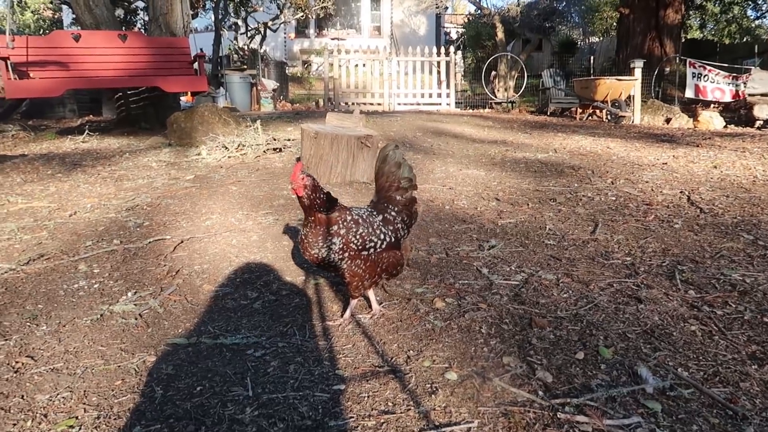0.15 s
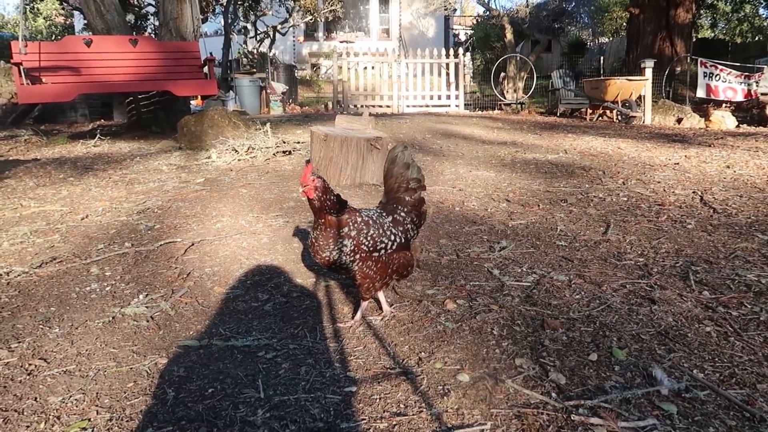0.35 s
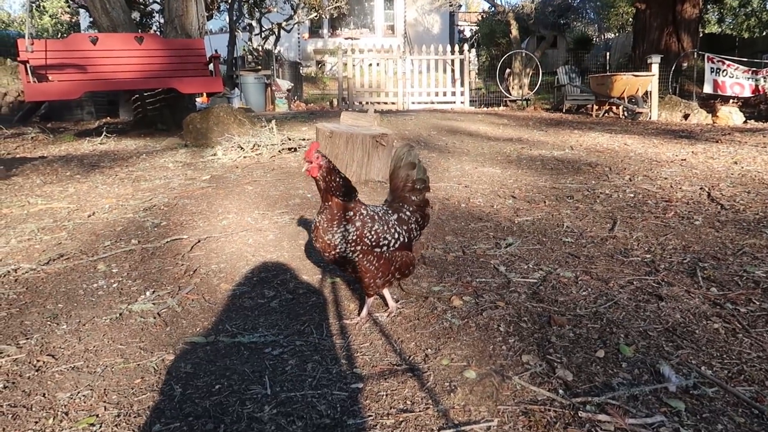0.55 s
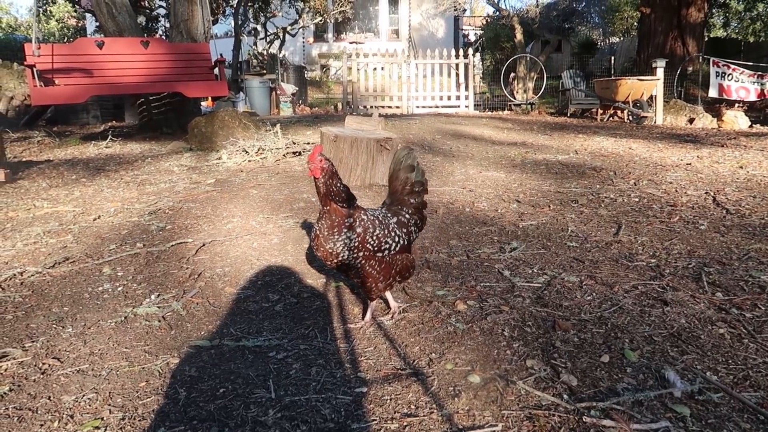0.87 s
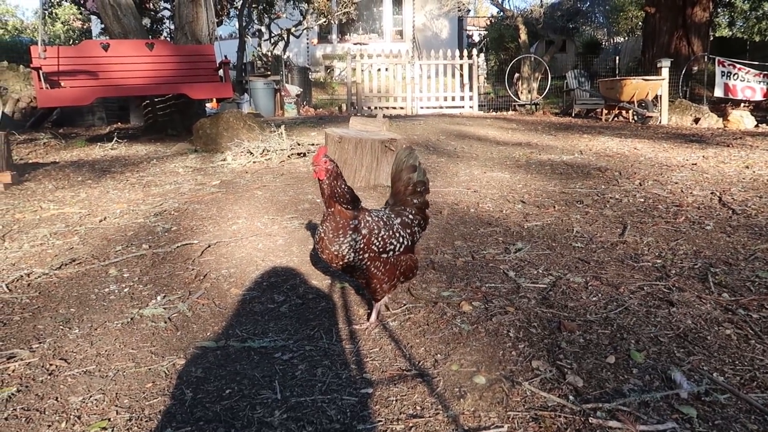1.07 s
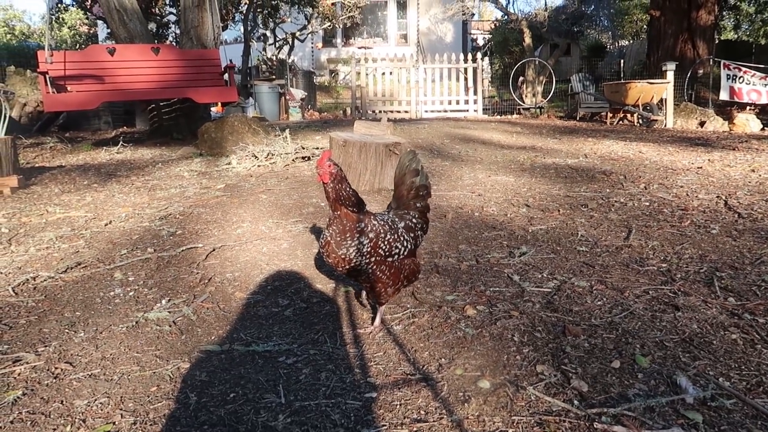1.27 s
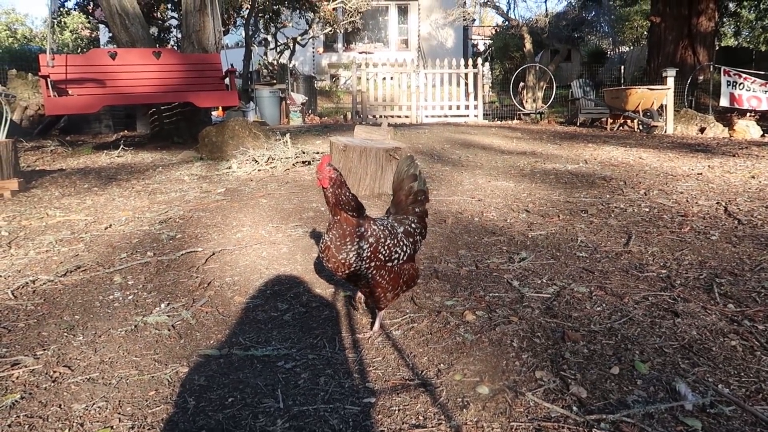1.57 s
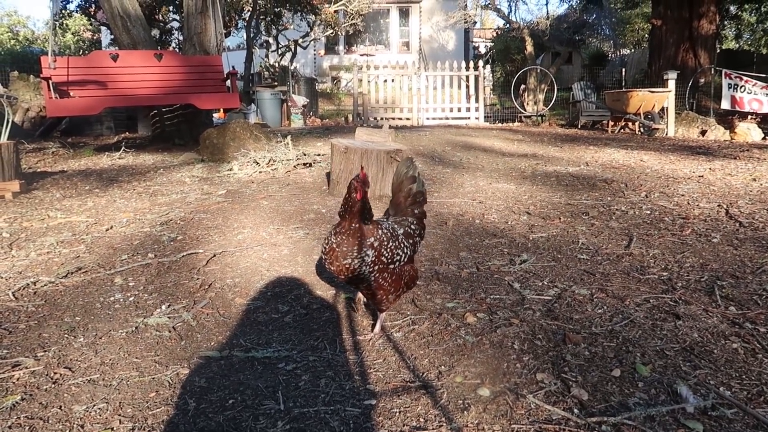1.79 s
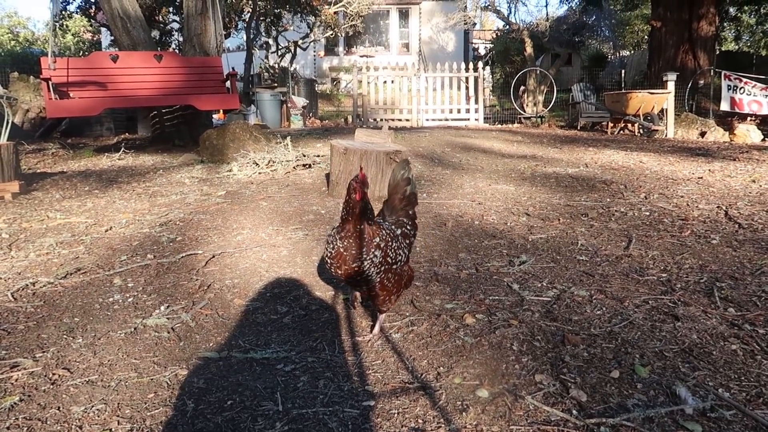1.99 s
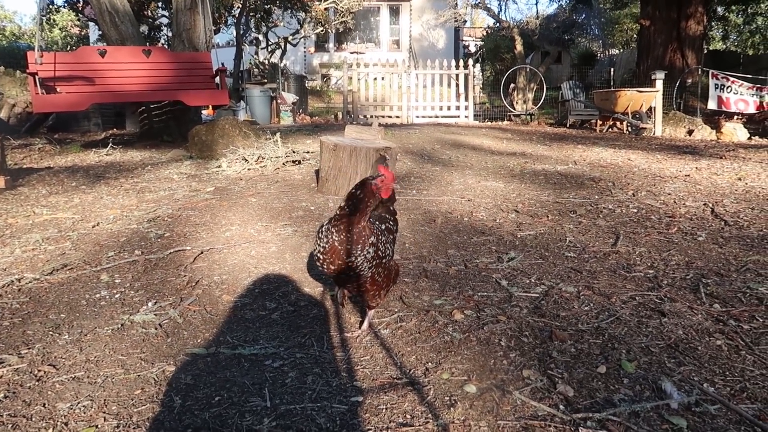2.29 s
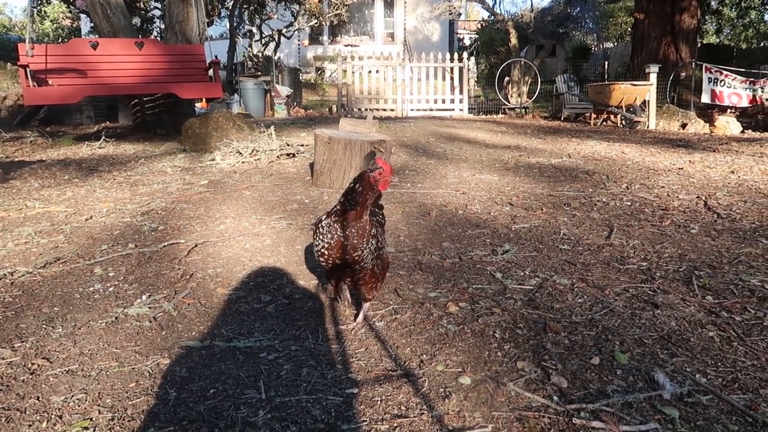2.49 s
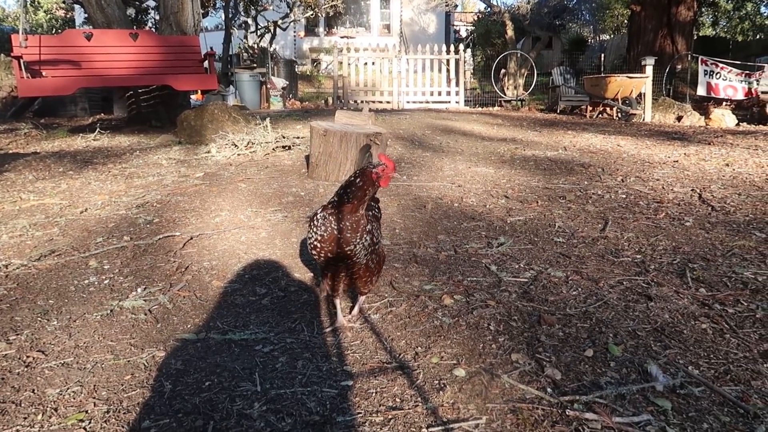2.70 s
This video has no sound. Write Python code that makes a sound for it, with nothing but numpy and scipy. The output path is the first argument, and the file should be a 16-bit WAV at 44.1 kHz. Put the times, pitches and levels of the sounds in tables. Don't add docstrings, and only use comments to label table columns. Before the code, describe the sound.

A hen close to the microphone clucks at 0.2 and 0.45 seconds, running straight into a loud, raspy squawk from about 0.54 to 0.72. Single short clucks follow at 0.9, 1.15 and 1.45, then stronger ones about every quarter second from 1.7 to 2.55. A second hen clucks faintly further off, clearest around 2 to 2.7. Soft leaf hiss, distant traffic and faint low engine drone surround the open yard.

```python
import sys
import numpy as np
from scipy import signal
from scipy.io import wavfile
from scipy.ndimage import uniform_filter1d

SR = 44100
rng = np.random.default_rng(int(sys.argv[2]) if len(sys.argv) > 2 else 0)


def volts(x):
    e = np.asarray(x, float) / 20
    return 10 ** e


def store_pcm(level_fs):
    pcm = np.round(np.clip(level_fs, -1, 1) * 32767).astype(np.int16)
    wavfile.write(sys.argv[1], SR, np.atleast_2d(pcm).T)


N = 125685

# t/s, level/dB, f/Hz
CLUCK_CONTOURS = [
    [(.199, -25, 242.6), (.217, -22.5, 269), (.229, -19.5, 263.6), (.241, -28, 227.3), (.25, -35, 248)],
    [(.442, -23.5, 250.5), (.46, -16, 279.5), (.486, -20, 302.3), (.497, -32.5, 279)],
    [(.873, -24, 281.8), (.89, -18.5, 315), (.904, -20.5, 291), (.922, -26.5, 278.7), (.935, -36, 262)],
    [(1.138, -24, 267), (1.156, -22.5, 305.5), (1.164, -19, 300.3), (1.178, -27, 268.8),
     (1.195, -33, 236.4)],
    [(1.454, -26, 255.7), (1.472, -18.5, 278.1), (1.482, -22.5, 273), (1.496, -25.5, 244),
     (1.505, -35, 233)],
    [(1.7255, -16.5, 283.7), (1.74, -13.5, 299.1), (1.752, -14.5, 290.2), (1.766, -17.5, 260),
     (1.78, -35, 246)],
    [(2.009, -14, 292.6), (2.017, -19.5, 273.8), (2.035, -12, 274.2), (2.041, -19, 259),
     (2.051, -18.5, 236.5), (2.056, -31, 238)],
    [(2.269, -20.5, 240), (2.275, -20, 241), (2.289, -12.5, 278.6), (2.297, -13.5, 279.3),
     (2.311, -17.5, 242), (2.322, -35, 242)],
    [(2.521, -19, 221.6), (2.541, -15, 278.8), (2.551, -12.5, 271.2), (2.569, -20, 238.5),
     (2.578, -36, 227)],
]
# brightness/dB, throat size factor, lift of resonances 2, 3 and 4/dB
CLUCK_MANNERS = [(3.5, 1.002, 0.1, 0.1, -2), (3.5, 1.024, 0.1, -1.5, -2.5), (.5, 1.06, 1.9, -2.5, -2),
                 (4.5, 1.001, 0.77, -3, -1.5), (4, 0.98, 1.2, -1, 0.1), (1.7, 1.031, 0.053, -3.5, -3),
                 (3.3, 1.015, -1.5, -0.5, -6), (3.5, 1.016, -0.91, 0, -3), (0.6, 1.019, -0.17, -0.5, -3.5)]
CLUCK_HOARSENESS = [.18, .18, .32, .09, .05, .04, .08, .08, .08]
# f/Hz, width/Hz, level/dB
OPEN_THROAT = [(1017.6, 238, 32.5), (2187, 342, 15), (3090, 673, 17), (4054, 344, 15), (5950, 170, 4.5),
               (7650, 260, 4)]
# f/Hz, width/Hz, level/dB
SHUT_THROAT = [(919, 152, 31), (1883, 260, 20.5), (2910, 340, 16.5), (4170, 330, 6)]
# f/Hz, level/dB
CLUCK_SLOPE = [(120, -20.5), (270, -3), (450, -9), (1500, -9), (5000, -20), (10000, -27.5), (16000, -46.5)]

# t/s, level/dB, f/Hz, hoarseness 0-1
SQUAWK_CONTOUR = [
    (.538, -17, 539.5, 0.62),
    (.548, -8.5, 576.9, 0.38),
    (.561, -11.5, 623, 0),
    (0.583, -14, 635.8, 0.08),
    (0.603, -15, 633, 0),
    (0.627, -12, 612.3, 0.08),
    (0.672, -13, 610.9, 0),
    (0.694, -19, 571.8, 0.5),
    (0.721, -37, 549.4, 0.74),
]
# t/s, f/Hz, level/dB
SECOND_VOICE = [
    (0.559, 1073, -35),
    (.581, 1067, -17),
    (.605, 1075, -18.5),
    (0.636, 1064, -26.5),
    (0.657, 1048, -26.5),
    (0.68, 1003, -22.5),
    (0.691, 1075, -20.5),
    (0.713, 1126, -22),
    (0.724, 1112, -37),
]
# t/s, length/s, hoarseness 0-1
CATCHES = [
    (0.582, 0.0046, 0.4),
    (0.598, 0.0048, .45),
]
# f/Hz, width/Hz, level/dB
SQUAWK_THROAT = [(1074, 280, 22.85), (2345, 1160, 13.9), (3000, 930, 4.8), (3900, 290, 6.9),
                 (4880, 190, 5.4), (5720, 350, 9.6), (6440, 990, 3.8), (11000, 1230, 1.7)]
# f/Hz, level/dB
SQUAWK_SLOPE = [(250, -22), (600, -13), (1500, -3), (4300, -17), (8000, -22), (9000, -27), (10000, -25),
                (16000, -47)]

# t/s, length/s, level/dB, peak f/Hz
FAR_CLUCKS = [(.0, 0.024, -53.5, 430.5), (0.498, 0.049, -62, 490), (1.052, 0.045, -46.5, 519),
              (1.224, 0.038, -48.5, 405.5), (1.406, 0.046, -45.5, 444), (1.608, 0.047, -45, 425),
              (1.796, 0.05, -41.5, 428), (1.976, 0.049, -36.5, 484), (2.151, .055, -33.5, 559),
              (2.317, 0.038, -33, 577.5), (2.483, 0.054, -36, 505.4), (2.698, 0.052, -38.5, 451.4)]
# f/Hz, width/Hz, level/dB
FAR_THROAT = [(1090, 460, 11.1), (2080, 470, 8), (2960, 360, 7.9), (4290, 820, 15.5)]
# f/Hz, level/dB
FAR_SLOPE = [(200, -31.5), (480, -2), (1500, -6), (5000, -30.5), (9000, -40), (16000, -57)]

# f/Hz, level/dB
PORT_DIFFERENCE = [(300, -66), (1300, -31.5), (2400, -24.5), (4400, -11), (8000, -7.5), (15000, 4)]
# delay t/s, level/dB
FENCE_ECHOES = [(0.023, -30.5), (0.048, -33.5), (.075, -44.5), (0.127, -49), (0.187, -49.5)]
# f/Hz, t60/s
YARD_DECAY = [(200, 0.59), (1000, 0.62), (3000, 0.87), (8000, 0.58)]

# f/Hz, level/dB
AIR_MID = [(15, -48), (25, -24), (102, -3.5), (229, -6.5), (1330, -10), (1440, -17), (1840, -12.5),
           (11900, -33.5), (16000, -65)]
# f/Hz, level/dB
AIR_SIDE = [(240, -46), (400, -14), (839, -14), (2020, 0.5), (4440, -3.5), (4880, -2.5), (11800, -13.5),
            (16000, -27)]
# t/s, level/dB
BREEZE = [(0, -0.5), (1.199, -4), (1.9, 3.5), (2.6, 5.5), (2.85, 5)]
# t/s, level/dB
DRONE = [(0, -74), (1.5, -68.5), (2.2, -65.5), (2.72, -68.5), (2.85, -51)]

ATTACK_S, RELEASE_S = 0.0033, 0.0088
JITTER, SHIMMER = 0.12, 0.79
BREATH, PUFF_DB = 0.21, -4.5
SMEAR_RAD = 0.0098
END_HOARSE, SHUT_POWER, SHUT_BRIGHT_DB = 0.34, 1.7, 0.5
BRIGHT_HZ = 1840
PATCH_DB, SQUAWK_PATCH_DB, PATCH_HZ = 4.5, 1.8, 1430
TOP_HZ, TOP_FADE_DB = 4500, -17
COUPLING_TURNS, SECOND_WOBBLE = 0.2, 0.0307
FAR_HOARSE, FAR_ARCH, FAR_FADE_DB = 0.22, 0.24, -12.5
SCATTER, SCATTER_S = 0.55, 0.004
YARD_DB, FAR_YARD_DB, YARD_SIDE_DB = -26.5, -12.5, 12
AIR_DB, AIR_SIDE_DB, BREEZE_HZ = -58, -64.5, 3500
DRONE_HZ, DRONE_WIDTH_HZ = 124, 22
LIMIT_DB, SQUEEZE, RECOVER_DB_PER_S, AIR_SQUEEZE = -17.5, 0.3, 9.5, 7.5


def cluck(rows, hoarse, bright_db, scale, *lift_db):
    s, db, hz = np.transpose(rows)
    t = np.arange(s[0] - ATTACK_S, s[-1] + RELEASE_S / 2, 1 / SR)
    done = (t - t[0]) / (t[-1] - t[0])
    pitch = uniform_filter1d(np.interp(t, s, hz), size=300, mode="nearest")
    drive = syrinx(pitch, hoarse + END_HOARSE * done ** 4)
    lifts = (0, *lift_db, 0, 0)
    throat = [(f, w, g + lift) for (f, w, g), lift in zip(OPEN_THROAT, lifts)]
    shut = done ** SHUT_POWER
    open_voice = colour(drive, CLUCK_SLOPE, throat, scale, bright_db)
    shut_voice = colour(drive, CLUCK_SLOPE, SHUT_THROAT, scale, bright_db + SHUT_BRIGHT_DB)
    voice = (1 - shut) * open_voice + shut * shut_voice
    return t[0], shape(ragged(voice, 3.0), t, np.interp(t, s, db))


def squawk():
    s, db, hz, hoarse = np.transpose(SQUAWK_CONTOUR)
    t = np.arange(s[0] - ATTACK_S, s[-1] + RELEASE_S, 1 / SR)
    pitch = np.interp(t, s, hz)
    catch = sum(h * np.exp(-((t - c) / w) ** 2) for c, w, h in CATCHES)

    s2, hz2, db2 = np.transpose(SECOND_VOICE)
    strength = volts(np.interp(t, s2, db2, left=-80))
    second_hz = np.interp(t, s2, hz2) * (1 + SECOND_WOBBLE * wobble(len(t), 187))
    second_turns = np.cumsum(second_hz) / SR
    octave_turns = 2 * np.cumsum(pitch) / SR
    pull = COUPLING_TURNS * strength * np.sin(2 * np.pi * (octave_turns - second_turns))

    drive = syrinx(pitch, np.interp(t, s, hoarse) + catch, pull)
    voice = ragged(colour(drive, SQUAWK_SLOPE, SQUAWK_THROAT), 7.0, SQUAWK_PATCH_DB)
    first = shape(voice, t, np.interp(t, s, db))
    second = np.sqrt(2) * strength * np.sin(2 * np.pi * second_turns)
    thump = volts(-53.5) * np.exp(-((t - 0.549) / 0.0042) ** 2)
    return t[0], first + second + thump


def syrinx(hz, hoarse, pull=0):
    n, mean = len(hz), hz.mean()
    turns = np.cumsum(hz * (1 + JITTER * hoarse * wobble(n, mean / 2))) / SR + pull - 0.6
    k = np.arange(1, int(16500 / hz.max()))[:, None]
    pulses = evened(np.cos(2 * np.pi * k * turns + SMEAR_RAD * k ** 2).sum(0))
    pulses = pulses * np.exp(SHIMMER * hoarse * wobble(n, mean))
    puffs = evened(np.exp(-(turns % 1) / 0.65) * rng.standard_normal(n))
    return pulses + volts(PUFF_DB) * (BREATH + 3 * hoarse) * puffs


def colour(x, slope, throat=(), scale=1, bright_db=0):
    hz = abs(np.fft.fftfreq(4096, 1 / SR))
    bumps = 1 + sum(volts(2 * db) / (1 + (2 * (hz - f * scale) / w) ** 2) ** 2 for f, w, db in throat)
    tilt_db = bright_db * hz ** 4 / (hz ** 4 + BRIGHT_HZ ** 4)
    log_gain = np.log(volts(read(slope, hz) + tilt_db) * np.sqrt(bumps))
    taps = np.fft.ifft(np.exp(np.conj(signal.hilbert(log_gain)))).real[:2048]
    return signal.oaconvolve(x, taps)[:len(x)]


def ragged(x, fade_power, patch_db=PATCH_DB):
    hz, t, z = signal.stft(x, SR, nperseg=256, noverlap=192)
    patches = uniform_filter1d(rng.standard_normal(z.shape), size=3, axis=0)
    patches = evened(uniform_filter1d(patches, size=8, axis=1))
    hz4 = hz[:, None] ** 4
    upper = hz4 / (hz4 + PATCH_HZ ** 4)
    top = hz4 / (hz4 + TOP_HZ ** 4)
    gain = volts(patch_db * patches * upper + TOP_FADE_DB * (t / t[-1]) ** fade_power * top)
    return signal.istft(z * gain, SR, nperseg=256, noverlap=192)[1][:len(x)]


def shape(sound, t, level_db):
    level = np.sqrt(uniform_filter1d(sound ** 2, 500, mode="mirror") + 1e-12)
    attack = np.clip((t - t[0]) / ATTACK_S, 0, 1) ** 2
    release = np.clip((t[-1] - t) / RELEASE_S, 0, 1)
    return sound / (level ** 0.37 * np.mean(level) ** 0.53) * volts(level_db) * (attack * release)


def wobble(n, hz):
    size = int(SR / hz / 2)
    return evened(uniform_filter1d(uniform_filter1d(rng.standard_normal(n), size), size))


def evened(x):
    return x / np.sqrt(np.mean(x ** 2) + 1e-20)


def read(points, hz):
    f, value = np.transpose(points)
    return np.interp(np.log(hz + 1), np.log(f + 1), value)


def add(mix, s, sound):
    part = mix[max(round(s * SR), 0):][:len(sound)]
    part += sound[:len(part)]


def far_cluck(start, length, db, top_hz):
    t = np.arange(0, length, 1 / SR)
    arch = np.sin(np.pi * t / length)
    drive = syrinx(top_hz * (1 - FAR_ARCH * (1 - arch)), FAR_HOARSE)
    voice = evened(ragged(colour(drive, FAR_SLOPE, FAR_THROAT), 3.5))
    return start, voice * volts(db + 1.5 + FAR_FADE_DB * (1 - arch)) * np.minimum(3 * arch, 1)


def ports(x):
    burst = rng.standard_normal(400) * np.exp(-np.arange(400) / SR / SCATTER_S)
    side = colour(x, PORT_DIFFERENCE)
    scattered = signal.oaconvolve(side, burst / np.linalg.norm(burst))[:N]
    return (1 - SCATTER / 2) * side + SCATTER * scattered


def yard(x):
    taps = np.zeros((2, SR))
    at = np.arange(400, SR - 20, 20) + rng.integers(0, 20, (2, (SR - 401) // 20))
    np.put_along_axis(taps, at, rng.choice([-1., 1.], at.shape), 1)
    hz, t, z = signal.stft(taps, SR, nperseg=256)
    decay = volts(-60 * t / read(YARD_DECAY, hz)[:, None])
    tail = signal.istft(z * decay, SR, nperseg=256)[1]
    tail *= volts(YARD_DB) / np.linalg.norm(tail[0])
    for s, db in FENCE_ECHOES:
        add(tail[0], s, volts(db) * np.hanning(9) / 2)
    mid, side = signal.fftconvolve(x[None], tail, axes=1)[:, :N]
    return np.array([mid, volts(YARD_SIDE_DB) * colour(side, PORT_DIFFERENCE)])


def air():
    frames, hz = N // 256 + 5, np.fft.rfftfreq(1024, 1 / SR)
    real, imaginary, patches = rng.standard_normal((3, 2, 513, frames))
    patches = evened(uniform_filter1d(uniform_filter1d(patches[0], 10, 0), 10, 1))
    frame_s = np.arange(frames) / SR * 256
    leaf_band = hz ** 2 / (hz ** 2 + BREEZE_HZ ** 2)
    breeze_db = np.outer(leaf_band, np.interp(frame_s, *np.transpose(BREEZE)))
    spectra_db = np.array([read(AIR_MID, hz), read(AIR_SIDE, hz)])[:, :, None]
    z = (real + 1j * imaginary) * volts(spectra_db + 2.1 * patches + breeze_db)
    mid, side = signal.istft(z, nperseg=1024, noverlap=768)[1][:, :N]
    t = np.arange(N) / SR
    drone = np.cos(2 * np.pi * DRONE_HZ * t) * wobble(N, DRONE_WIDTH_HZ)
    drone = drone + np.sin(2 * np.pi * DRONE_HZ * t) * wobble(N, DRONE_WIDTH_HZ)
    drone = volts(np.interp(t, *np.transpose(DRONE))) * drone
    return np.array([volts(AIR_DB) * evened(mid) + drone, volts(AIR_SIDE_DB) * evened(side)])


def ducking(x):
    power_db = 10 * np.log10(abs(uniform_filter1d(x ** 2, 2500)) + 1e-12)
    fall = np.arange(N) * RECOVER_DB_PER_S / SR
    held_db = np.maximum.accumulate(power_db + fall) - fall
    over_db = np.maximum(held_db - LIMIT_DB, 0)
    return volts(-SQUEEZE * uniform_filter1d(over_db, 200))


def scene():
    near, far = np.zeros(N), np.zeros(N)
    for rows, hoarse, manner in zip(CLUCK_CONTOURS, CLUCK_HOARSENESS, CLUCK_MANNERS):
        add(near, *cluck(rows, hoarse, *manner))
    add(near, *squawk())
    for row in FAR_CLUCKS:
        add(far, *far_cluck(*row))
    direct = np.array([near + far, ports(near - 3 * far)])
    echoes = yard(near + volts(FAR_YARD_DB - YARD_DB) * far)
    duck = ducking(near)
    mid, side = direct + echoes * duck + air() * duck ** AIR_SQUEEZE
    return np.array([mid + side, mid - side])


def top_cut(x):
    return signal.sosfilt(signal.butter(12, 16440, fs=SR, output="sos"), x)


def record(dry):
    return top_cut(dry)


dry = scene()
out = record(dry)
store_pcm(out)
```